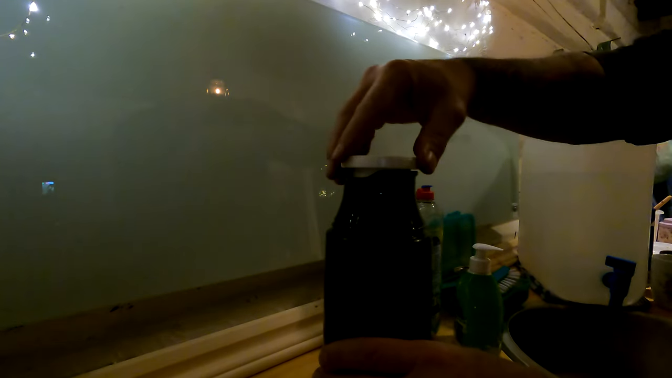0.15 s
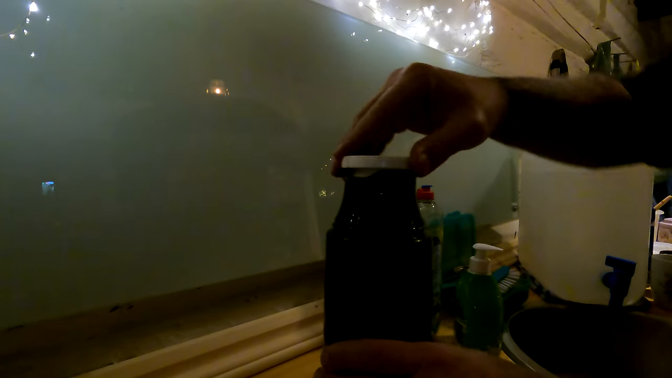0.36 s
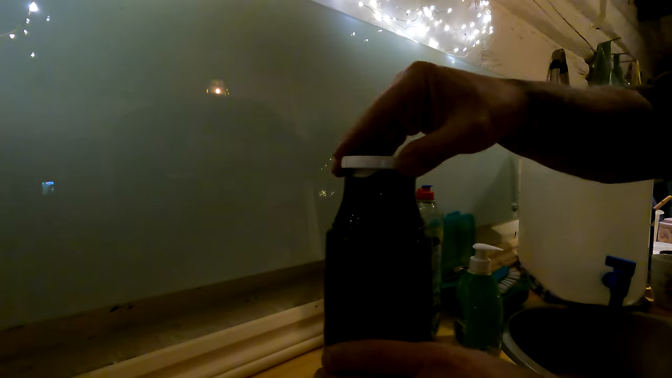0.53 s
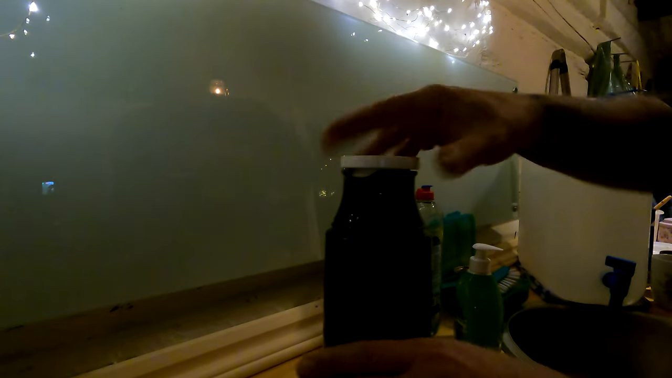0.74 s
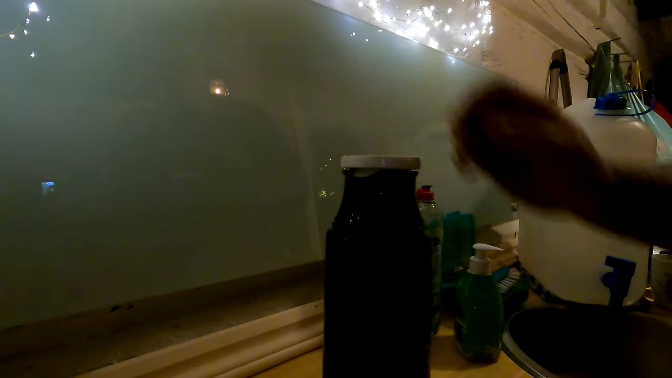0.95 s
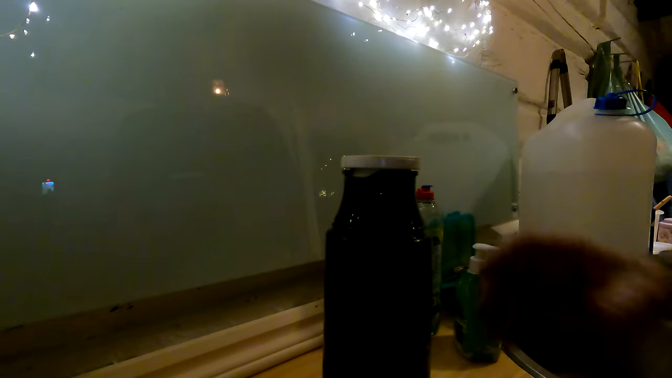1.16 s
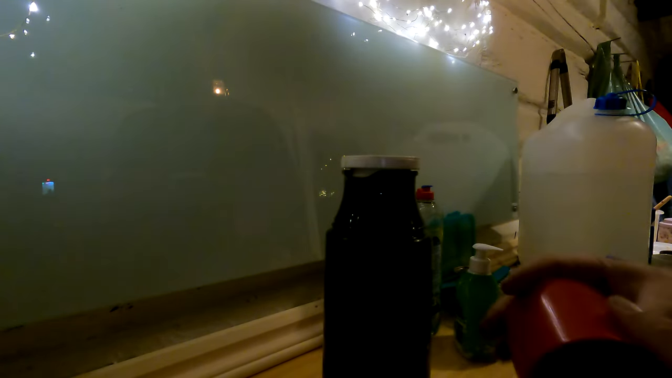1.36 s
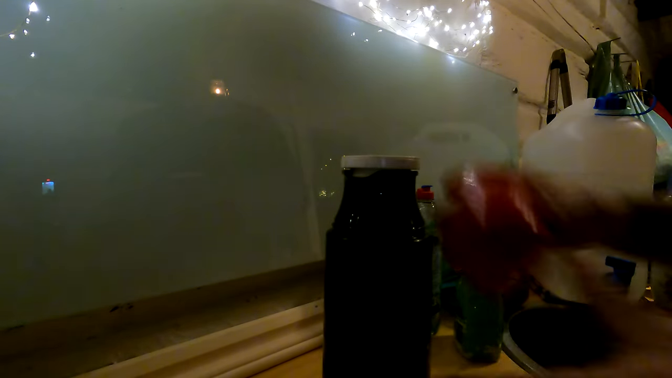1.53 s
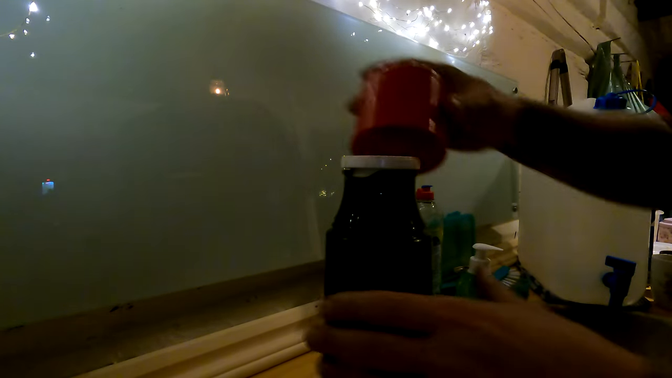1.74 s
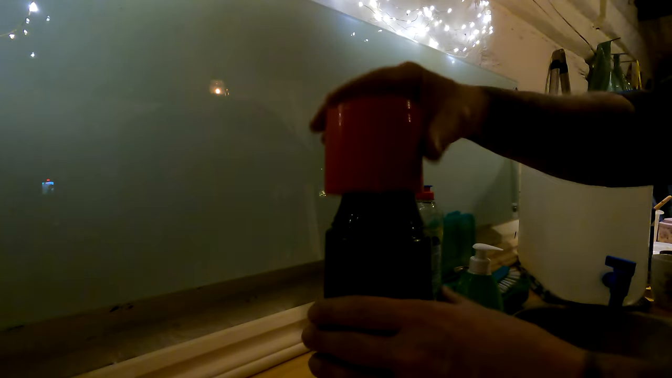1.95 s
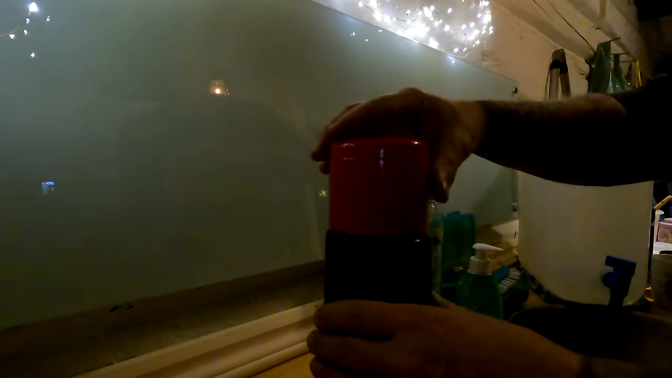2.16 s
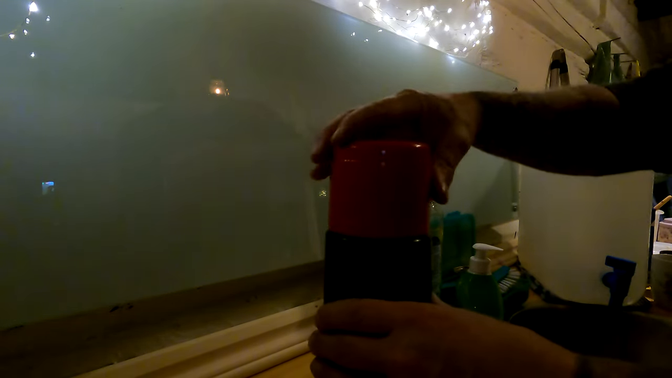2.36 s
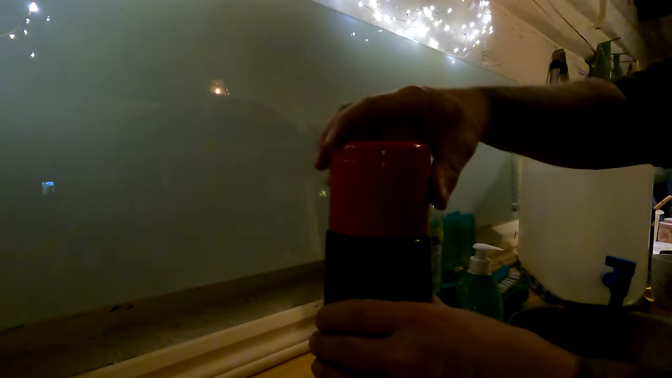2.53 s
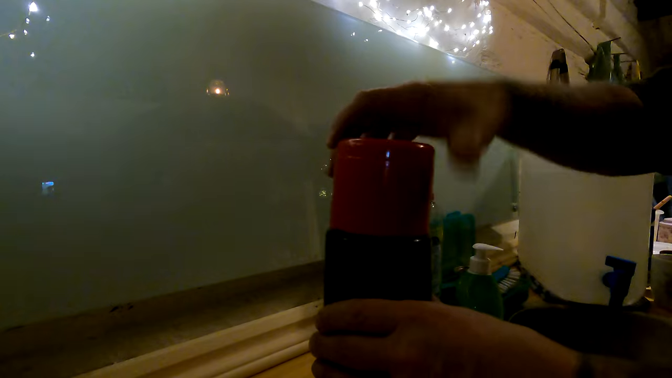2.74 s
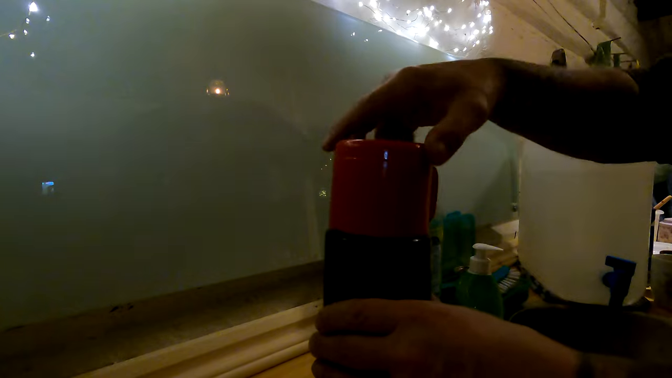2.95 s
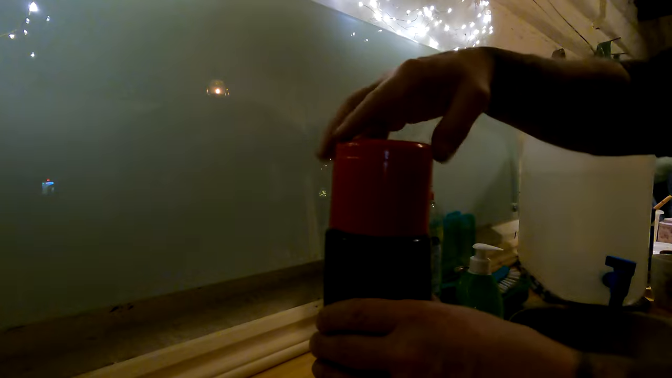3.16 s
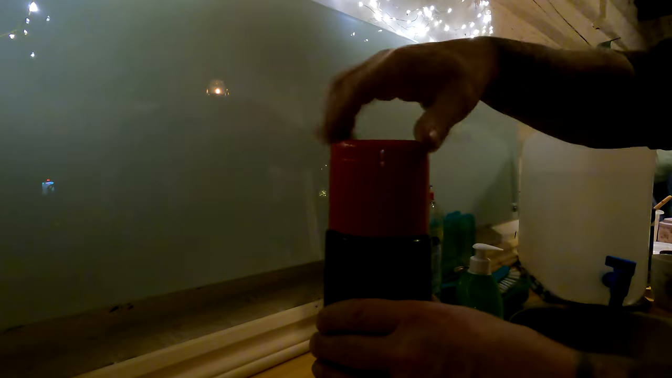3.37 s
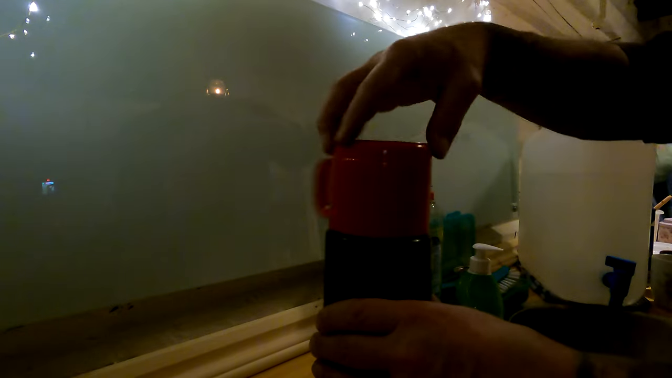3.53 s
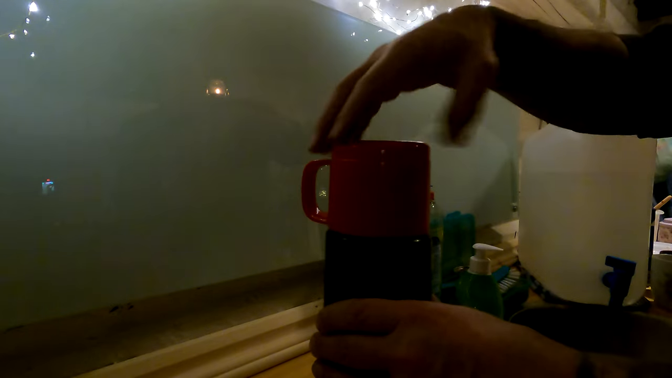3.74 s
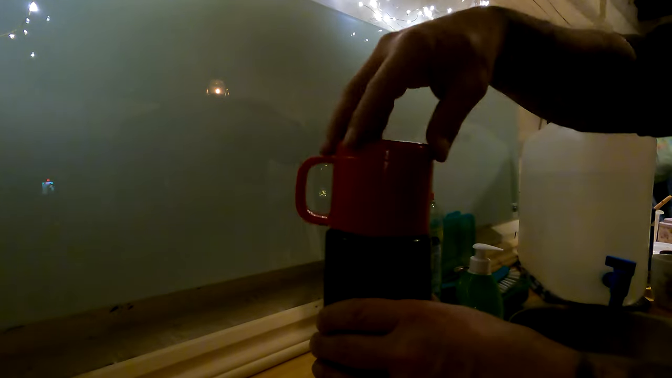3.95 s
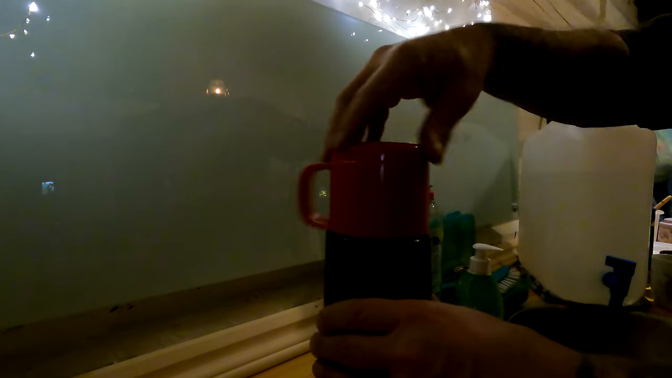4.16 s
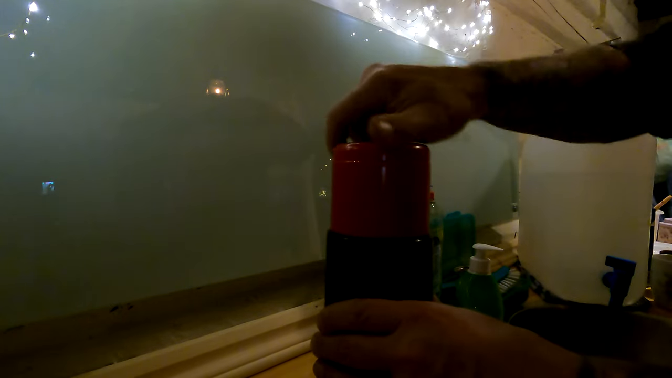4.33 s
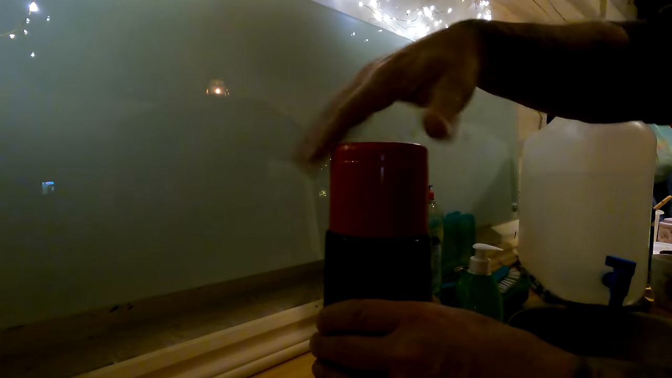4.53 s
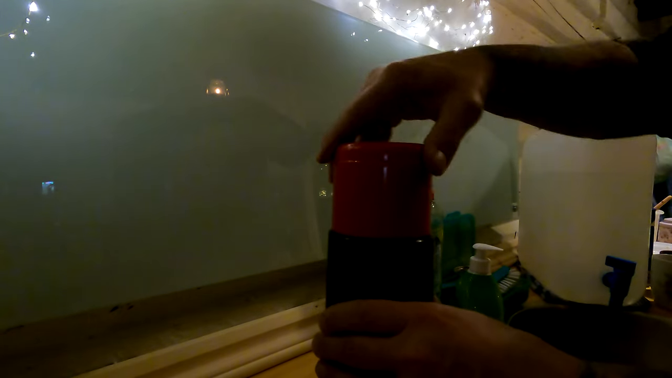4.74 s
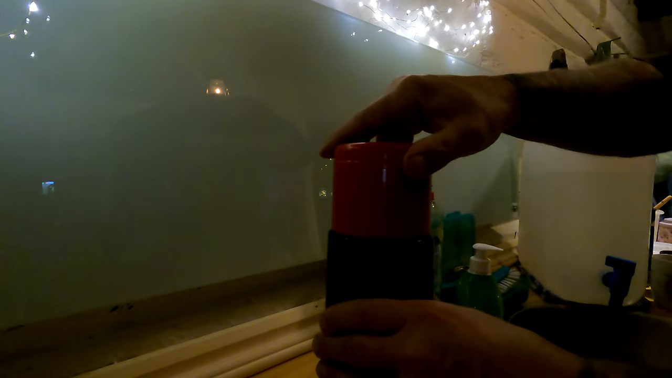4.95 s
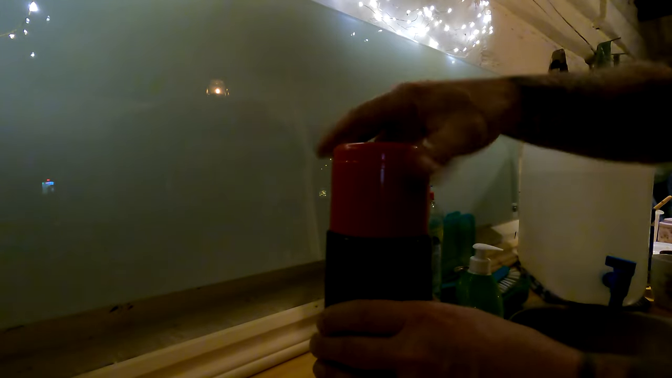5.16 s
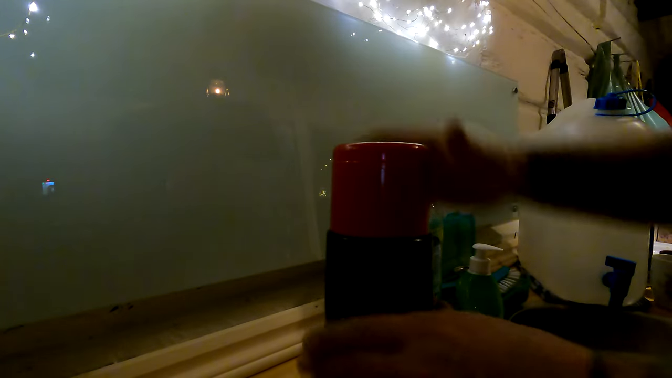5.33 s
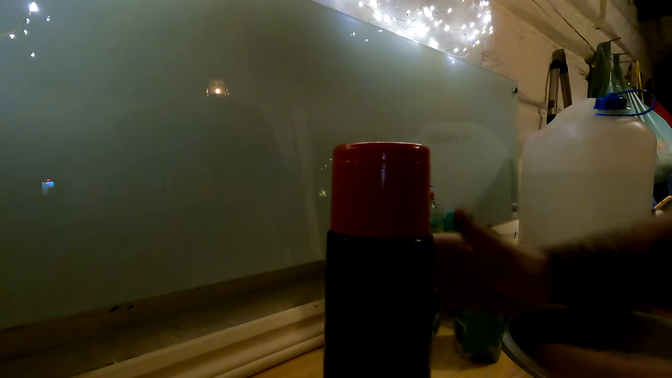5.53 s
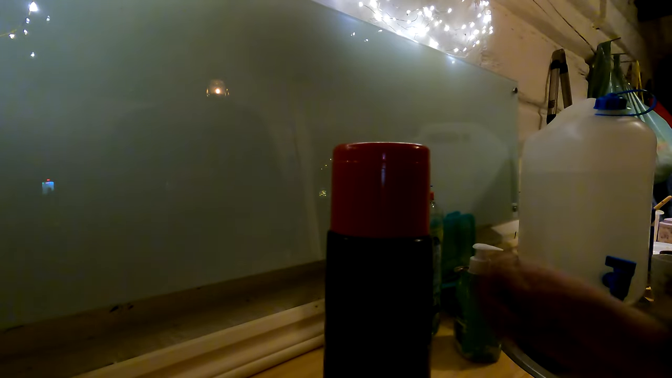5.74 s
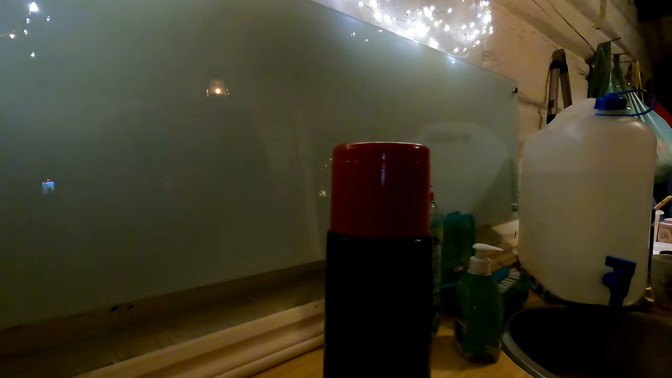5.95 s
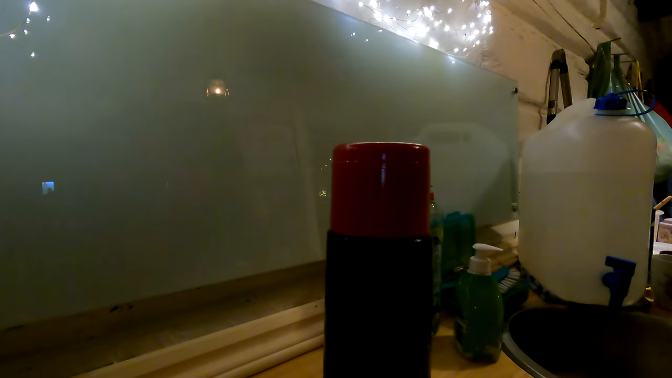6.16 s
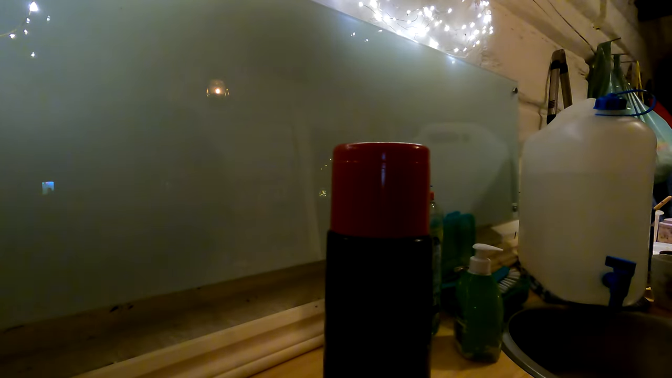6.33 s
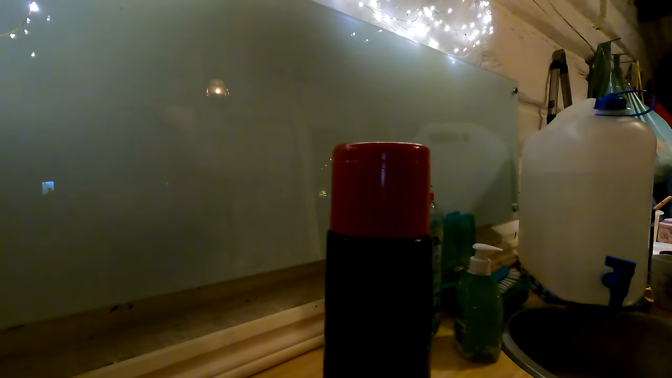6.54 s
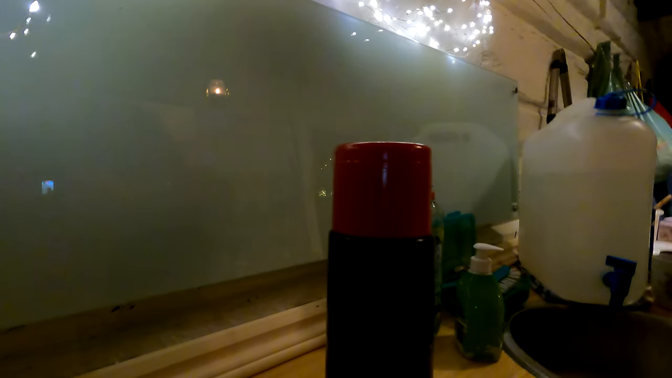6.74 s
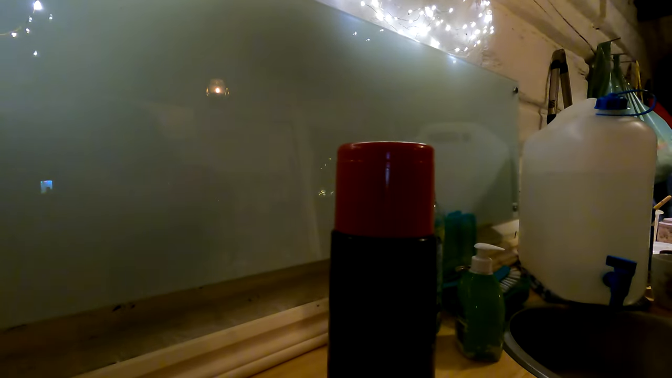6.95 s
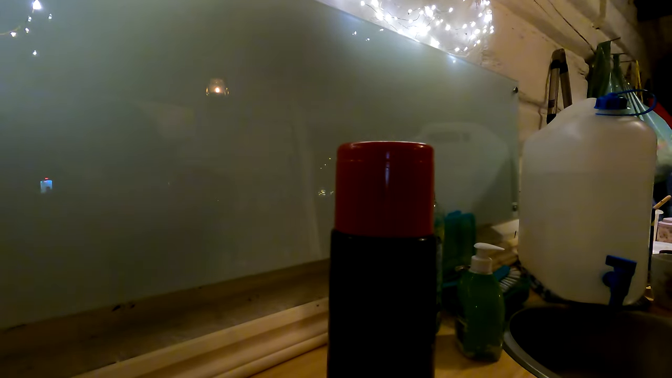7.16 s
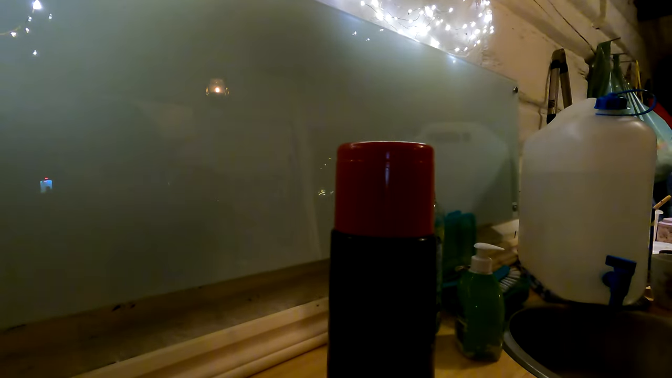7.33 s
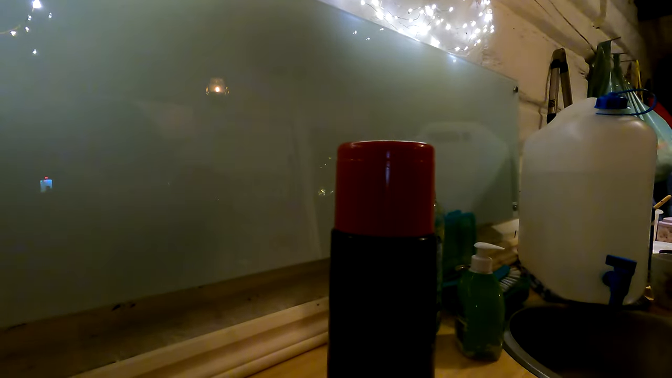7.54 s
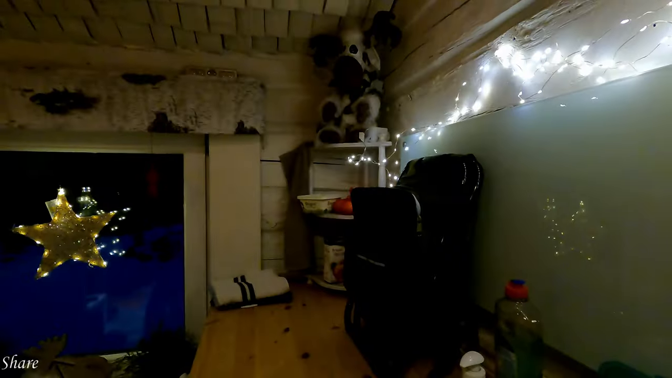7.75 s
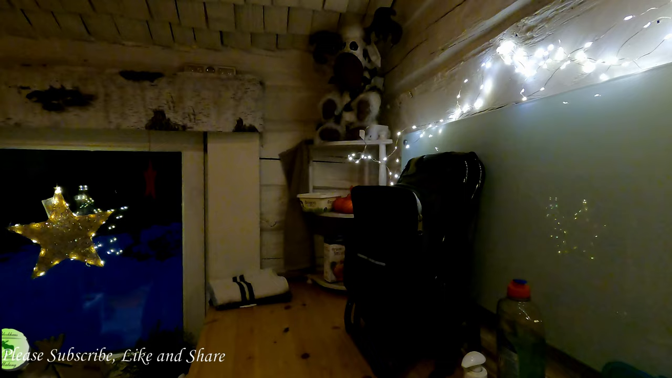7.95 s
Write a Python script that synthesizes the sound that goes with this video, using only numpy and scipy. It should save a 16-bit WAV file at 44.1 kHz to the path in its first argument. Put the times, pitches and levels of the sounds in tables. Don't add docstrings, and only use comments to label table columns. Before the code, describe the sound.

Close to a small camera on a wooden worktop, in a dry little room with faint hiss. From 0 to 0.7 s a hand turns a flask stopper with faint rubber and plastic rubs and a soft bump. At 0.8-1.1 s come a light click and low thumps, then near quiet with tiny ticks. At 2.15 s a hollow plastic cup clacks onto the flask, knocking again at 2.3 s. Until 3.8 s it is twisted in short bursts: hollow knocks, gritty scrapes, low wall groans, wooden thumps. The hardest clacks, with a slight steely ring, fall at 3.9-4.1 s; lighter rattles continue to 4.5 s, and a hard final tightening hits at 4.9 s. Small taps and thuds follow at 5.3-5.4 s, a soft palm thud at 6.0 s. From 6.85 s handling makes a dull low hum, mostly on the right. Silence cuts in at 7.6 s; hiss fades back around 7.9 s.

```python
import sys
import numpy as np
from scipy import signal
from scipy.fft import rfft, irfft
from scipy.io import wavfile
from scipy.ndimage import uniform_filter1d

SR = 44100
rng = np.random.default_rng(int(sys.argv[2]) if len(sys.argv) > 2 else 0)


def undo_db(level):
    steps = np.asarray(level, float) / 20
    return 10 ** steps


def transcribe(u):
    v = np.clip(np.atleast_2d(u).T, -1, 1)
    q = np.round(v * 32767).astype(np.int16)
    wavfile.write(sys.argv[1], SR, q)


N = 352344
T = np.arange(N) / SR
TOUCH_S = 6.8

# pitch in Hz, level in dB, time to fade by 60 dB in seconds.
CUP_RINGS = [(292, -25.5, 0.012), (393, -6.5, 0.032), (563, -7.5, 0.036), (692, -8, 0.034),
             (851, -9, 0.014), (941, -10, 0.036), (1043, -6, 0.021), (1235.4, -9, 0.018),
             (1343, -12.5, .03), (1560, -14.5, 0.019), (1716, -14, 0.032), (2037, -14, 0.044),
             (2380, -14.5, 0.04), (3040, -13.5, 0.018), (3747, -17.5, 0.052), (4850, -26.5, 0.017),
             (5100, -28, 0.017)]
# pitch in Hz, width in Hz, level in dB.
PANEL_NOTES = [(156.15, 33, -2), (196.6, 53, -1)]


def unit(x):
    return x / np.sqrt(np.mean(x ** 2))


def lowpass(x, hz, order):
    return signal.sosfilt(signal.butter(order, hz, fs=SR, output="sos"), x)


def highpass(x, hz, order):
    return signal.sosfilt(signal.butter(order, hz, "high", fs=SR, output="sos"), x)


def colour(x, points):
    hz, db = np.transpose(points)
    grid = np.maximum(np.fft.rfftfreq(4096, 1 / SR), 1)
    log_gain = np.interp(np.log(grid), np.log(hz), db) * np.log(10) / 20
    cepstrum = irfft(log_gain)
    cepstrum[1:2048] *= 2
    cepstrum[2049:] = 0
    response = irfft(np.exp(rfft(cepstrum)))[:2048]
    return signal.fftconvolve(x, response)[:len(x)]


def ring(x, peaks):
    return sum(undo_db(db) * signal.lfilter(*signal.iirpeak(hz, hz / width, fs=SR), x)
               for hz, width, db in peaks)


def add(out, s, x):
    i = max(int(s * SR), 0)
    out[..., i:i + x.shape[-1]] += x[..., :N - i]


def sides(pan_db):
    return undo_db(np.array([pan_db, -pan_db]) / 2)


def grit(rate, scatter_db):
    happens = rng.random(N) < rate / SR
    return happens * rng.standard_normal(N) * undo_db(scatter_db * rng.exponential(size=N))


def walk(size):
    return unit(uniform_filter1d(uniform_filter1d(rng.standard_normal(N), size), size))


def gestures(s, hold, db, rise, fall, rest_db=-95):
    t = T[::64, None]
    shapes = db - rise * np.maximum(s - t, 0) - fall * np.maximum(t - s - hold, 0)
    return undo_db(np.interp(T, t[:, 0], np.maximum(shapes.max(axis=1), rest_db)))


def steel_wall():
    # pitch in Hz, width in Hz, level in dB.
    pairs = [
        [(1786, 6, 0), (1795, 6, -7)],
        [(2024, 7, 0), (2038, 7, -2)],
    ]
    # start in seconds, lower pair level in dB, upper pair level in dB.
    steel_blows = [
        (2.188, 26, 6),
        (3.94, 12, 5),
        (4.1, 30, 10),
        (4.935, 23, 22),
    ]
    blows = np.zeros((2, N))
    for s, *blow_db in steel_blows:
        for wall, db in zip(blows, blow_db):
            add(wall, s, undo_db([db]))
    return sum(ring(wall, pair) for wall, pair in zip(blows, pairs))


def knocks():
    # start in
    # seconds, peak in dB, crack over body in dB, strongest ring in Hz.
    clean_knocks = [(0.467, -74, -17, 1730), (1.671, -47, 3, 875), (1.525, -48, -22, 856),
                    (2.322, -2, -84, 830), (2.584, -41, -21.5, 362), (2.794, -2.5, -26.5, 973),
                    (2.848, -14, -67, 940), (2.895, -7.5, -16.5, 710), (3.114, -30.5, -10.5, 373),
                    (3.129, -23.5, -14, 353), (3.472, -30, -10, 400), (3.5124, -5, -44, 900),
                    (3.624, -13, -34, 870), (4.003, -16, -10, 796), (4.077, -16, -40, 790),
                    (4.101, 9, -8, 1054), (4.48, -32, -5, 1900), (4.507, -25.5, 0, 3700),
                    (4.542, -32, -7, 1890), (4.907, -4, -22.5, 985), (4.935, 5, -18.5, 974),
                    (5.33, -44, 5, 2300), (7.453, -52, 15.5, 353.6), (7.974, -39, -18, 1240),
                    (3.918, -27, -12.5, 902)]
    rattles = [(0.185, -46.5, -25, 668), (0.809, -23, -3, 680), (1.079, -34.5, -6, 355),
               (1.098, -31.5, -7.5, 427), (1.47, -45.5, 2, 942), (2.024, -30, 0, 974),
               (2.034, -22.5, -26.5, 1007), (2.165, -1, -16.5, 910), (2.179, -7.5, -13, 960),
               (2.339, -20.5, -38, 546), (2.503, -45.5, -25.5, 407), (2.974, -19, -32, 697),
               (2.995, -18.5, -42, 381), (3.162, -15.5, -23, 360), (3.179, -13, -17, 395),
               (3.285, -15, -13, 931), (3.717, -7.5, -18, 708), (3.939, 1, -13, 913),
               (3.946, -2, -11, 1062), (4.271, -21.5, -21, 690.6), (4.344, -22.5, -7.5, 1310),
               (4.404, -25.5, -8, 900), (5.265, -36, -24, 637), (5.291, -34.5, -6, 890),
               (5.376, -42, 5.5, 525), (5.408, -24.5, -2, 656), (6.034, -28, -34, 348),
               (6.06, -33.5, -40, 428), (6.853, -37, -42, 312), (6.885, -44.5, -45, 312),
               (2.155, -22.5, -13, 794.5)]
    more_knocks = [(2.761, -35, -33, 980), (2.784, -22, -25, 680), (2.841, -27, -34, 643),
                   (2.981, -29, -10, 3500), (3.277, -21, -23, 880), (3.296, -15, -25, 419), (4, -25, -26, 584),
                   (3.5, -25.5, -19, 1170), (4.282, -23.5, -10.5, 604), (4.353, -22, -18, 897),
                   (4.372, -23, -13, 783), (5.228, -42.5, -35, 660), (2.188, -9, -9, 1700), (4.4, -26, -40, 648),
                   (4.942, -10, -12, 1000), (3.503, -28.5, -25, 600), (5.281, -35, -8, 1500),
                   (4.093, -20, -19, 970), (4.512, -30.5, -15, 900), (4.386, -25.5, -6, 2100),
                   (2.023, -29, -4, 2500), (3.2, -21, -37, 540), (3.637, -21, -33, 390),
                   (3.934, -16.5, -19.5, 930), (1.252, -52, -30, 860)]
    # frequency in Hz, level in dB.
    crack_colour = [(800, -16.5), (2000, -0.5), (4000, 1), (7000, -8.5), (11000, -23), (15500, -36)]
    clean_chatter_s, rattle_chatter_s = 0.0025, 0.0065
    lead_s, rebound_s = 1 / 90, 0.00023
    grip_hz, grip_damping = 1100, 0.45
    events = [(*row, clean_chatter_s) for row in [*clean_knocks, *more_knocks]]
    events += [(*row, rattle_chatter_s) for row in rattles]

    bodies, snaps, t = np.zeros(N), np.zeros(N), T[:3600]
    hz, db, t60 = np.transpose(CUP_RINGS)[:, :, None]
    t60 = t60 * np.maximum(hz / grip_hz, 1) ** -grip_damping
    for s, peak_db, crack_db, top_hz, chatter_s in events:
        soft_hand = 6 < s < 7
        if soft_hand:
            chatter_s *= 3

        rise_s = 0.22 * min(chatter_s, rattle_chatter_s)
        swell = np.exp(np.minimum((t - lead_s) / rise_s, (lead_s - t) / chatter_s))
        noise = rng.standard_normal((2, len(t)))
        contacts = swell * noise[0] * noise[1] ** 2 * 0.2 * np.sqrt(chatter_s / 0.004)
        contacts[int(lead_s * SR) + 70] += 1.5
        contacts[int((lead_s + rebound_s) * SR) + 70] -= 1.2 * 0.7

        near_db = 9.5 * np.exp(-(np.log(hz / top_hz) / 0.21) ** 2)
        near_db = near_db - 6.5 * np.log2(np.maximum(top_hz / hz, 1))
        hard_db = 0.17 * np.clip(crack_db + 19.0, -35, 0) * np.log2(np.maximum(hz / 1100, 1))
        if soft_hand:
            dulling_db = 21 if s > TOUCH_S else 7
            hard_db = hard_db - dulling_db * np.log2(np.maximum(hz / 380, 1))

        spot = rng.standard_normal((2, len(CUP_RINGS), 1))
        tones = np.sin(2 * np.pi * hz * (1 + 0.026 * spot[1]) * t)
        rings = undo_db(db + near_db + hard_db + 2.3 * spot[0]) * tones * 1000.0 ** (-t / t60)
        body = signal.fftconvolve(rings.sum(axis=0), contacts)
        add(bodies, s - lead_s, undo_db(peak_db + 1.5) * body / np.abs(body).max())
        add(snaps, s - lead_s, undo_db(peak_db + crack_db + 15.5) * contacts / np.abs(contacts).max())
    return lowpass(bodies, 6000, 1) + colour(snaps, crack_colour) + steel_wall()


def hollow(slips):
    # time in seconds, note in Hz.
    air_notes = [(0.6, 1202), (2.0, 946.5), (2.4, 680), (2.6, 1051), (2.76, 1148), (2.82, 749), (2.93, 522),
                 (3.1, 400), (3.23, 581.7), (3.35, 400), (3.54, 599.6), (3.75, 408), (3.95, 803),
                 (4.03, 620), (4.12, 950.6), (4.28, 726.4), (4.42, 625.7), (4.95, 951.5)]
    s, note_hz = np.transpose(air_notes)
    note = np.interp(T[::64], s, np.log(note_hz))
    out = 0
    for hz, db, t60 in CUP_RINGS[1:13]:
        off = np.log(hz) - note
        drift = uniform_filter1d(uniform_filter1d(rng.standard_normal(len(note)), size=24), size=24)
        gain_db = db + 10 * np.exp(-(off / 0.33) ** 2) + 4 * unit(drift)
        gain_db += 3.0 * np.minimum(off, 0) - 3.3 * np.maximum(off - 0.4, 0)
        out = out + np.repeat(undo_db(gain_db), 64)[:N] * ring(slips, [(hz, 2.6 / t60, 0)])
    evened = out / np.sqrt(uniform_filter1d(out ** 2, size=9000) + 1e-9)
    return evened * np.sqrt(uniform_filter1d(slips ** 2, size=9000))


def rubs():
    # start in seconds, hold in seconds, level in dB, brightness in dB.
    twists = [(2.035, 0.0016, -40, -12), (2.17, 0.0052, -16.5, -14.5), (2.325, 0.043, -31.5, -20.5),
              (2.595, .17, -43, -13), (2.64, .13, -48, -2), (3.65, .035, -46, -5), (2.78, 0.025, -31, -17),
              (2.84, 0.15, -39, -27.5), (3.135, 0.026, -43, -10), (3.178, .002, -29.5, -14.5),
              (3.23, 0.063, -39, -13), (3.48, .02, -42, -26), (3.524, 0.03, -35, -20),
              (3.605, 0.05, -41.5, -15), (3.73, 0.018, -36.5, -21.5), (3.285, 0.012, -36.5, -12.5),
              (3.2, 0.015, -36, -26), (3.946, 0.015, -20, -18), (3.99, 0.043, -32.5, -14.5),
              (4.097, 0.032, -20.5, -17), (4.26, 0.025, -33.5, -8.5), (4.34, 0.047, -35.5, -5),
              (4.49, 0.023, -42.5, -14.5), (4.914, 0.063, -26, -17), (4.97, 0.055, -38, -14)]
    brushes = [(0.02, 0.036, -41.5, -13.5), (0.33, 0.11, -58, -18), (0.57, 0.07, -68, -25),
               (0.765, 0.02, -52.5, -0.5), (0.814, 0.0017, -40.5, -7), (1.08, .025, -52, -6),
               (1.43, .01, -81, 0), (1.525, 0.0063, -73, 0), (4.65, 0.093, -68, -9.5),
               (4.778, 0.035, -56, 4.5), (5.283, .002, -50, -2.5), (5.407, 0.0018, -43.5, -1),
               (5.537, .002, -79, 17.5), (6.045, 0.047, -49, -42), (6.13, 0.059, -68.5, 9.5),
               (6.832, 0.0057, -70.5, 17), (6.87, 0.038, -73, 19.5), (7.115, 0.0053, -72.5, 4),
               (7.17, 0.05, -59.5, -1), (7.375, 0.019, -68.5, 0.5), (7.96, 0.027, -53.5, -26)]
    # frequency in Hz, level in dB.
    scrape_colour = [(120, -33), (200, -5), (314, -1.5), (459, -12.5), (521, 0.5), (1600, -14),
                     (2060, -11.5), (7690, -18.5), (15000, -60.5)]
    # pitch in Hz, width in Hz, level in dB.
    thread_notes = [(974, 81, 1), (1363, 36, 2.5), (1970, 430, -0.5), (3058, 29, -16), (4740, 140, -19)]
    stopper_notes = [(1160, 66, 1), (1720, 170, -6.5)]

    bursts = undo_db(1.2 * walk(size=500))
    slips = (unit(grit(4000, scatter_db=1.5)) + 1.3 * rng.standard_normal(N)) * bursts
    rough = 0.5 * unit(colour(slips, scrape_colour))
    rough += 0.45 * unit(ring(slips, thread_notes))
    rough += 1.25 * unit(hollow(slips))
    stopper_turns = (T > 0.2) & (T < 0.7)
    rough += 2.2 * stopper_turns * unit(ring(slips, stopper_notes))
    dull = unit(lowpass(rough, 1500, 2))
    bright = -unit(highpass(rough, 2100, 2))

    out = 0
    # rise, fall and extra fall of the treble, all in dB per second
    for rows, rise, fall, dulling in ((twists, 999.5, 270.5, 40.5), (brushes, 500, 380.5, 1.5)):
        s, hold, db, bright_db = np.transpose(rows)
        out = out + gestures(s, hold, db - 4.0, rise, fall) * dull
        out = out + gestures(s, hold, db + bright_db + 1.5, rise, fall + dulling) * bright
    return out


def groans():
    # start in seconds, hold in seconds, level in dB.
    drags = [(2.586, .015, -44.5), (2.797, 0.026, -34), (2.867, 0.035, -43.5), (2.902, 0.037, -36.5),
             (2.995, 0.0184, -39), (3.185, 0.025, -31.5), (3.23, 0.025, -38.5), (3.299, 0.027, -38.5),
             (3.48, .03, -38.5), (3.52, .04, -30), (3.628, .025, -31.5), (3.668, 0.018, -39.5),
             (3.73, 0.018, -34.5), (3.955, .02, -27), (4.007, .02, -31), (4.109, 0.046, -27),
             (4.272, .012, -31.5), (4.348, .04, -33.5), (4.407, 0.008, -37), (4.518, 0.033, -45),
             (4.95, 0.034, -28)]
    # pitch in Hz, width in Hz, level in dB.
    wall_notes = [(388, 30, 1.5), (526, 35, 0.5), (698, 30, -2.5)]
    s, hold, db = np.transpose(drags)
    drag = unit(grit(900, scatter_db=2.0)) + rng.standard_normal(N)
    return gestures(s, hold, db, 1199.5, 401, -120) * unit(ring(drag, wall_notes))


def thumps():
    # start in seconds, peak in dB, pitch in Hz, panel over swing in dB.
    stopper_blows = [(0.009, -37, 63.3, -12), (0.094, -40, 49.4, -26), (0.185, -23.5, 67, -6.5),
                     (0.495, -39.5, 61, -11), (0.715, -39.5, 79.5, 1), (0.76, -35.5, 39.5, 8),
                     (0.807, -14.5, 71.2, 0.5), (0.918, -26, 75, 0.5), (0.959, -16.5, 67.4, -10.5),
                     (1.076, -18.5, 71.5, -8.5), (1.466, -46.5, 91, 3.5)]
    cup_blows = [(2.022, -40.5, 108, 5), (2.165, -14, 69, -13), (2.322, -25.5, 80.7, -16),
                 (2.581, -41, 86.6, 12.5), (2.651, -32.5, 59.7, -2.5), (2.796, -29, 88, 11.5),
                 (2.992, -31, 47.4, -9), (3.161, -24, 69.6, -2), (3.285, -21.5, 62.2, -5),
                 (3.488, -14.5, 64.8, -8.5), (3.623, -23.5, 81.4, 8), (3.716, -15.5, 66.1, -12),
                 (3.877, -26.5, 68, -13.5), (3.937, -9, 84, 9.5), (4.098, -9, 80, 8), (4.134, -7, 47.1, -6),
                 (4.402, -26, 67.2, -4), (4.413, -24, 60.3, -4), (4.673, -18, 63.9, -13),
                 (4.733, -19, 71.4, -13), (4.908, -6, 108.2, -14.5), (4.923, -11, 95, 0),
                 (4.934, -9.5, 40.6, 3)]
    hand_blows = [(5.268, -18.5, 73.9, -5.5), (5.406, -18.5, 66.4, -6.5), (5.558, -42, 59, -1.5),
                  (6.033, -23.5, 110.2, 0.5), (6.103, -28, 40.2, -17), (6.84, -27, 106.6, -6),
                  (6.895, -31.5, 47, 3), (7.462, -24, 94.2, -40), (7.519, -30, 42.9, -19)]
    swings, pushes, t = np.zeros(N), np.zeros(N), T[:20000]
    for s, db, hz, panel_db in [*stopper_blows, *cup_blows, *hand_blows]:
        sagging_t = t + 0.0044 * (1 - np.exp(-t / 0.022))
        swing = np.sin(2 * np.pi * hz * sagging_t) * 1000.0 ** (-t * (hz / 24 + 1.0))
        onset = (1 - np.exp(-t / 0.0059)) ** 2
        add(swings, s, undo_db(db) * swing * onset)
        push_hz = 170 * (1 + 0.064 * rng.standard_normal())
        push = t * np.exp(-t / 0.005) * np.sin(2 * np.pi * push_hz * t)
        add(pushes, s, undo_db(db + panel_db - 2.5) * push / np.abs(push).max())
    return swings + ring(pushes, PANEL_NOTES)


def press():
    # start in seconds, sway in dB, panel in dB, settling in dB per second.
    leans = [(0.0, -27, -45, 199), (0.21, -40, -53, 46), (0.79, -43, -33.5, 76), (0.837, -23, -43, 103),
             (1.112, -26.5, -33.5, 267), (1.2, -51, -62, 84), (2.04, -54.5, -47.5, 8.5),
             (2.202, -31.5, -24.5, 404), (2.343, -26, -33, 302.5), (2.674, -41, -46, 154),
             (2.819, -45, -30.5, 60), (3.0, -31.5, -50, 33), (3.178, -32, -28, 106), (3.507, -28, -29, 104),
             (3.659, -44, -39, 40), (3.741, -26.5, -34.5, 190.5), (3.941, -19.5, -32, 138),
             (4.126, -14, -25.5, 106), (4.275, -33, -38.5, 31), (4.421, -27.5, -38.5, 96),
             (4.68, -29, -43, 75), (4.944, -13.5, -17.5, 178.5), (5.278, -20.5, -31, 350),
             (5.423, -27.5, -46, 203.5), (5.552, -37, -53, 200), (6.056, -42, -30.5, 193),
             (6.132, -38, -47.5, 193), (6.865, -37, -42, 301), (7.209, -45, -48.5, 67),
             (7.483, -37.5, -50, 177)]
    # pitch in Hz, width in Hz, level in dB.
    worktop_notes = [(49.8, 27, 1), (75, 14, -11)]
    case_notes = [(145, 7, 2), (222, 120, -16)]
    s, sway_db, panel_db, settle = np.transpose(leans)
    sway = unit(ring(ring(grit(300, scatter_db=0.4), worktop_notes), worktop_notes))
    shifts = grit(500, scatter_db=1.27)
    untouched = unit(ring(ring(shifts, PANEL_NOTES), PANEL_NOTES))
    touched = undo_db(7.0) * unit(ring(ring(shifts, case_notes), PANEL_NOTES))
    panel = np.where(T < TOUCH_S, untouched, touched)
    sway_gain = gestures(s, 0, sway_db - 0.5, 380.5, settle, -66.5)
    panel_gain = gestures(s, 0, panel_db - 4.5, 800.5, settle, -70.5)
    return sway_gain * sway + panel_gain * panel


def housing():
    # start in seconds, hold in seconds, peak in dB.
    hums = [
        (6.86, 0.012, -28),
        (6.892, 0.018, -34),
        (6.962, .04, -50),
        (7.126, .005, -41),
        (7.16, .04, -40),
        (7.219, 0.044, -33.5),
        (7.315, 0.037, -45),
        (7.372, 0.055, -40.5),
        (7.467, 0.029, -31.5),
        (7.508, 0.024, -35.5),
    ]
    s, hold, db = np.transpose(hums)
    hz = 147.4 * (1 + 0.035 * walk(size=900))
    note = np.sin(2 * np.pi * np.cumsum(hz) / SR)
    return gestures(s, hold, db, 1101, 522, -120) * note


def room(x):
    # band centre in Hz, time to fade by 60 dB in seconds, level in dB.
    echoes = [
        (1750, 0.0073, -19),
        (11300, 0.014, -7),
        (400, 0.22, -30),
        (1480, .18, -27.5),
        (5003, .15, -20),
    ]
    t, tail = T[:9000], 0
    for hz, t60, db in echoes:
        edges_hz = [hz / 1.9, min(hz * 3.0, 0.45 * SR)]
        band = signal.butter(2, edges_hz, "band", fs=SR, output="sos")
        noise = signal.sosfilt(band, rng.standard_normal((2, len(t))))
        fade = noise * 1000.0 ** (-t / t60) * (t > 0)
        tail = tail + undo_db(db) * fade / np.sqrt((fade ** 2).sum(axis=1, keepdims=True))
    return signal.fftconvolve(x[None], tail, axes=1)[:, :N]


def air():
    # frequency in Hz, level in dB.
    air_colour = [(70, -25), (150, -12.5), (300, -20), (600, -26.5), (1200, -25.5), (2200, -30),
                  (3800, -34), (6400, -31), (8500, -38), (15000, -50)]
    # time in seconds, level in dB.
    hiss_levels = [(.05, 0), (.2, -5), (.6, -1), (1.0, -5), (1.4, -1), (2.0, -1), (5.4, 0), (5.7, 2),
                   (6.35, 2), (6.5, 0), (6.9, 1), (7.05, -3), (7.6, -1)]
    mid, side = (colour(rng.standard_normal(N), air_colour) for _ in range(2))
    scale = np.std(highpass(mid, 300, 4))
    tone = (mid + 0.6 * side * np.array([[1], [-1]])) * undo_db(-68.5) / scale
    low = lowpass(tone, 2500, 1)
    hiss_db = 2 * walk(size=7000) + np.interp(T, *np.transpose(hiss_levels))
    return undo_db(2.2 * walk(size=7000)) * low + undo_db(hiss_db) * (tone - low)


def scene():
    flask = knocks() + rubs() + groans()
    carried = (thumps() + press() + housing()) * sides(-7.2 * (T > TOUCH_S))
    loud = signal.lfilter([1 / 9000], [1, 1 / 9000 - 1], np.abs(flask + 0.033 * carried[1]))
    hiss = air() * (1 + loud / 0.041) ** -0.45
    return flask * sides(-0.3)[:, None] + room(flask) + carried + hiss


def roll_off(x):
    return signal.sosfilt(signal.butter(12, 16010, fs=SR, output="sos"), x)


def record(dry):
    cut_s, fade_start_s, fade_end_s = 7.602, 7.885, 7.985
    heard = lowpass(dry, 13000, 4)
    fade_in = np.clip((T - fade_start_s) / (fade_end_s - fade_start_s), 0, 1)
    edit = (T < cut_s) + fade_in
    return roll_off(np.clip(heard, -0.99, 0.99) * edit)


dry = scene()
out = record(dry)
transcribe(out)
```